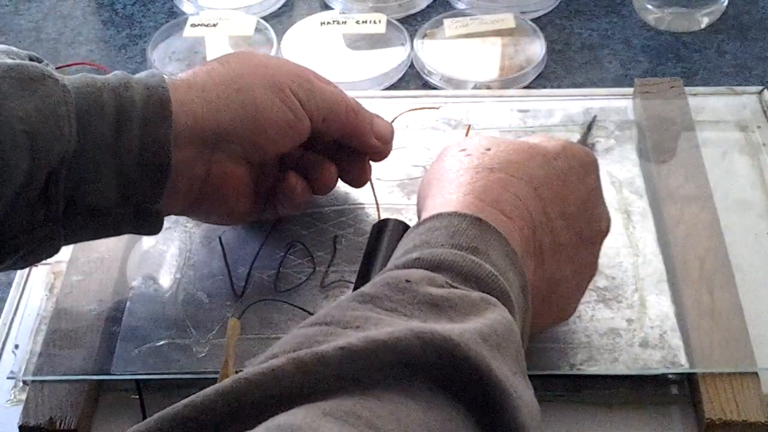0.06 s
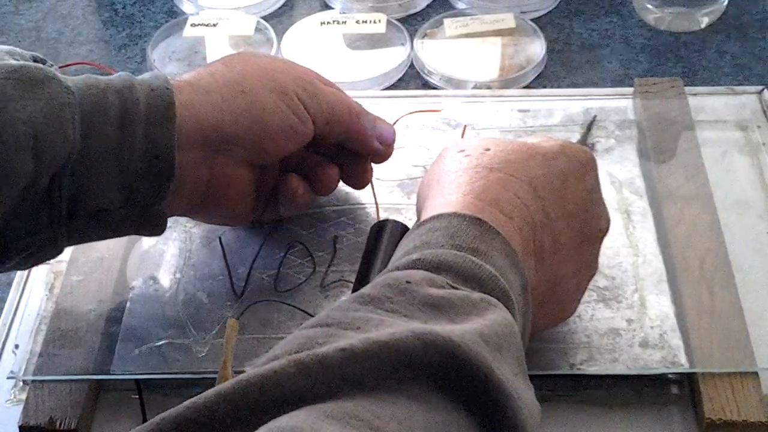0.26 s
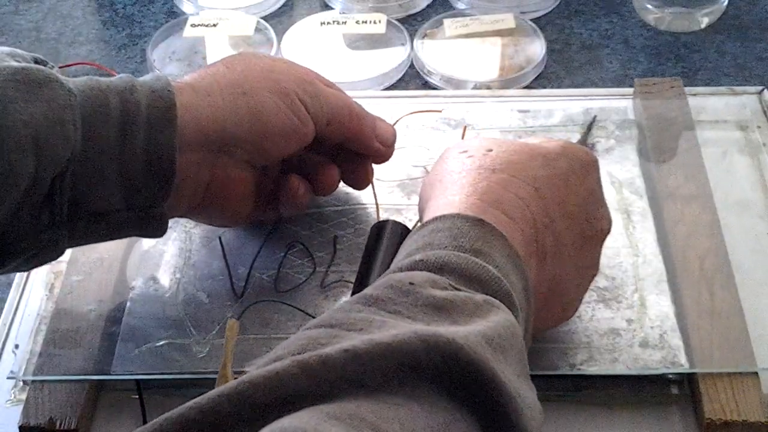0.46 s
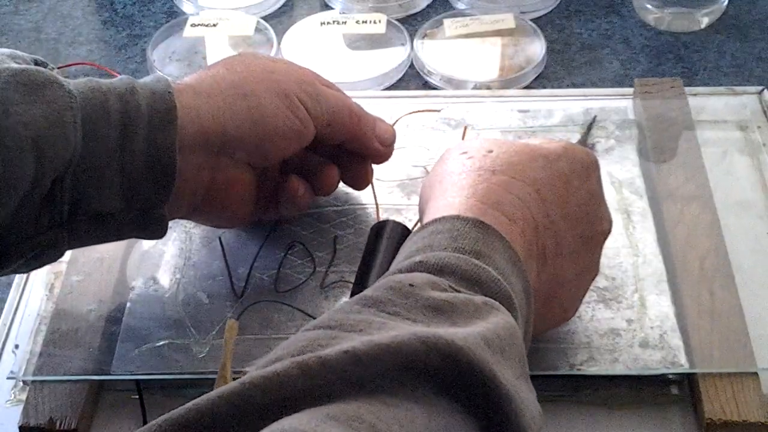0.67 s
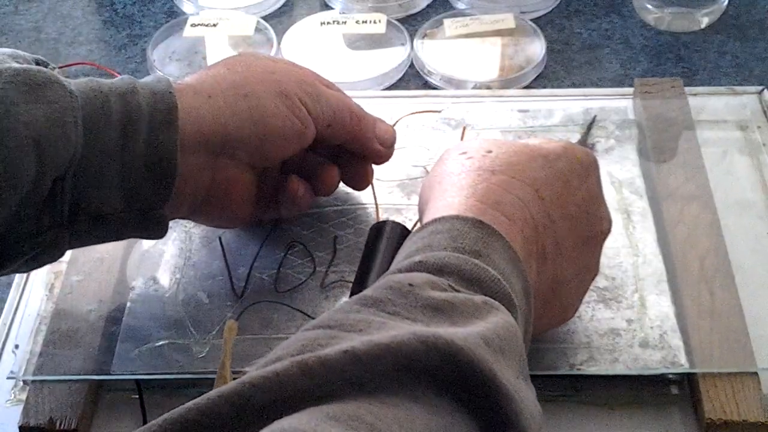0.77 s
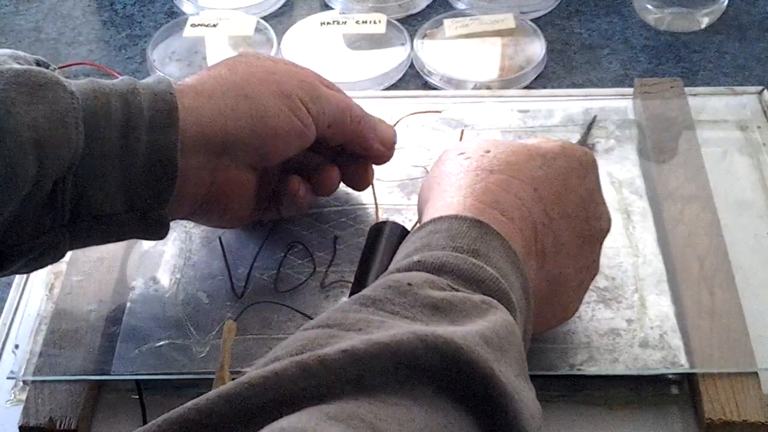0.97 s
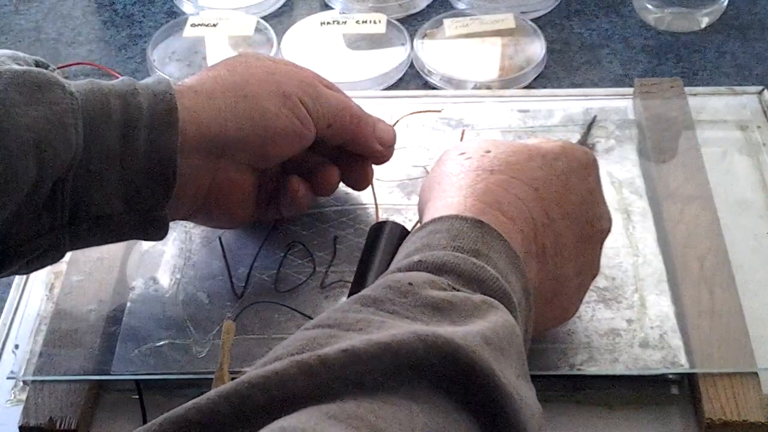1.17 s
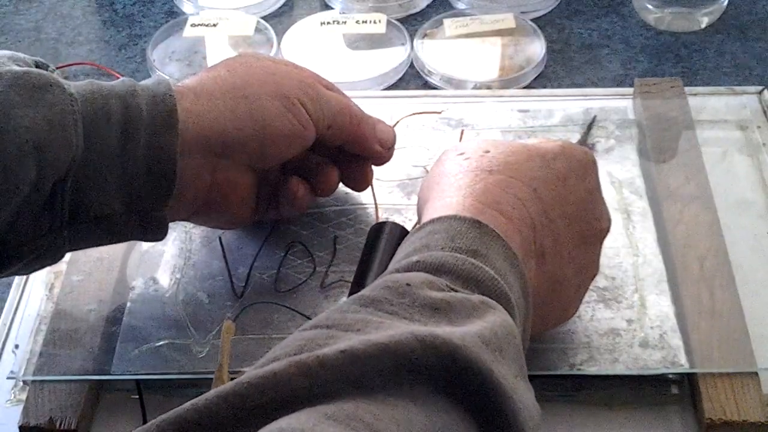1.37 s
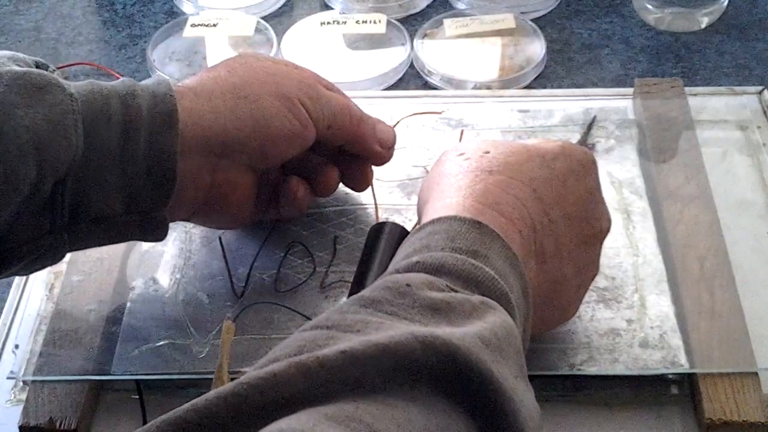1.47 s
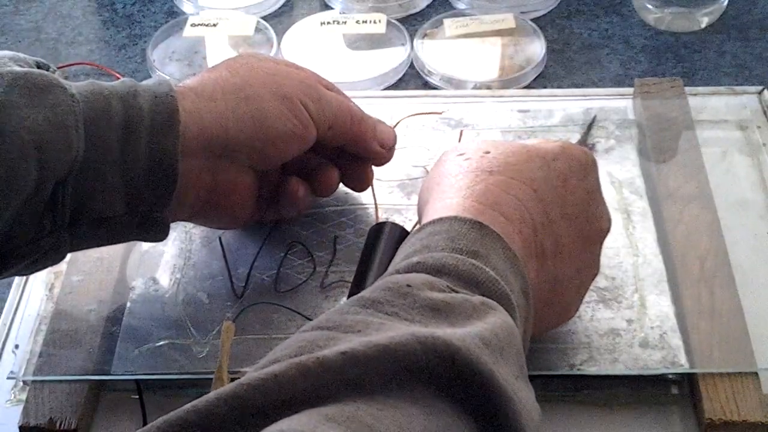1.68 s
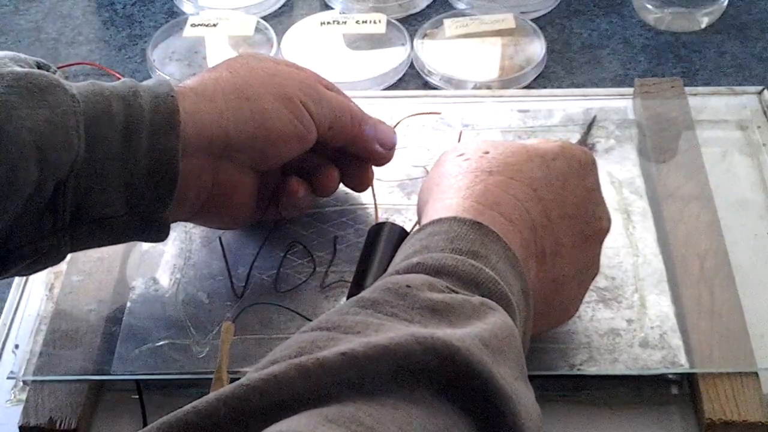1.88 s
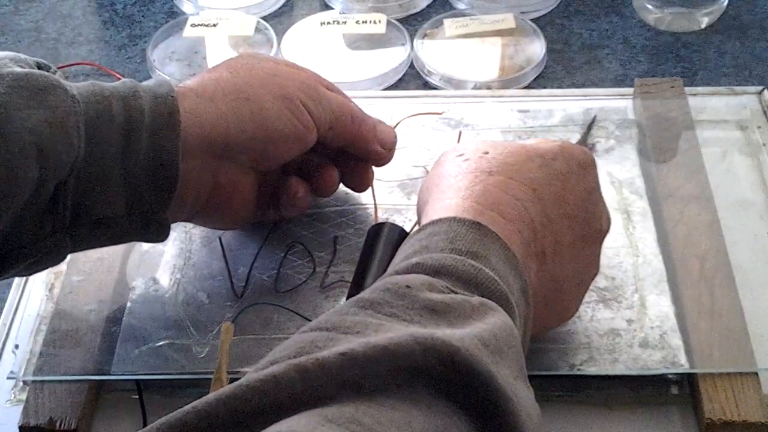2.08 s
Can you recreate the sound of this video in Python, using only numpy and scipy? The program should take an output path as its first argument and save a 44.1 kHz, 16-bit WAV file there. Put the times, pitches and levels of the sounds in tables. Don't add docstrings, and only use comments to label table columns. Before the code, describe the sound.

Sharp electric sparks snap loudly across a gap, sparse at first, then in quick succession.

```python
import sys
import numpy as np
from scipy import signal
from scipy.fft import rfft, irfft, next_fast_len
from scipy.io import wavfile
from scipy.ndimage import uniform_filter1d

SR = 44100
rng = np.random.default_rng(int(sys.argv[2]) if len(sys.argv) > 2 else 0)


def voltage_ratio(level):
    return 10 ** (np.asarray(level, float) / 20)


def inscribe(sig):
    pcm = np.round(np.clip(np.atleast_2d(sig).T, -1, 1) * 32767)
    wavfile.write(sys.argv[1], SR, pcm.astype(np.int16))


N = 93844


def unit(x):
    return x / np.sqrt(np.mean(x ** 2) + 1e-20)


def along(points, hz):
    point_hz, value = np.transpose(points)
    return np.interp(np.log(hz + 1), np.log(point_hz + 1), value)


def filtered(x, response):
    size = next_fast_len(len(x) + 8192)
    gain = response(np.fft.rfftfreq(size, 1 / SR))
    return irfft(rfft(x, size) * gain, size)[:len(x)]


def hiss(spectrum, size):
    return unit(filtered(rng.standard_normal(size), lambda hz: voltage_ratio(along(spectrum, hz))))


# freq_hz, density_db (per Hz)
HUSH_SPECTRUM = [(15, -49.5), (25, -24.5), (247, -11), (276, -5), (314, -12.5), (845, -16), (2000, -23),
                 (2600, -63), (4400, -120)]
# freq_hz, density_db (per Hz)
MIC_SPECTRUM = [(1180, -41), (2000, -1), (2210, -9.5), (2950, -3), (4080, -9), (5780, -11), (6280, -14.5),
                (7790, -9), (14500, -8)]
# pitch_hz, level_db, width_hz
HUMS = [
    (290.6, -69, 25),
    (898, -70, 10.85),
]


def room_tone():
    hush_db, mic_db = -57.5, -58
    tone = np.zeros(N)
    for pitch_hz, level_db, width_hz in HUMS:
        resonance = lambda hz: 1 / (1 + ((hz - pitch_hz) / width_hz) ** 2)
        tone += voltage_ratio(level_db) * unit(filtered(rng.standard_normal(N), resonance))
    return tone + voltage_ratio(hush_db) * hiss(HUSH_SPECTRUM, N) + voltage_ratio(mic_db) * hiss(MIC_SPECTRUM, N)


# freq_hz, density_db (per Hz)
BENCH_SPECTRUM = [(88, -48), (150, -15), (1910, -5.5), (2650, -6), (3270, -4), (5510, -10.5), (6060, 0.5),
                  (11900, -8.5), (15000, -6)]
# freq_hz, density_db (per Hz)
ROOM_SPECTRUM = [(40, -52), (200, -24.5), (450, -18), (750, -13.5), (2200, -7.5), (3300, -8), (4300, -2),
                 (6400, -7.5), (9000, -1.5), (15500, -1)]
# freq_hz, t60_s
ROOM_T60 = [(300, 0.84), (800, .62), (1500, 0.51), (3500, 0.55), (6000, 0.48), (9000, 0.34), (14000, 0.27)]


def scatter():
    bench_db, bench_t60_s, room_db = -3.5, 0.055, -7
    bend_db = -180
    t = np.arange(SR // 2) / SR
    hz, frame_s, z = signal.stft(hiss(ROOM_SPECTRUM, len(t)), SR, nperseg=128)
    decay_db = -60 * frame_s / along(ROOM_T60, hz)[:, None] + bend_db * frame_s ** 2
    tail = signal.istft(z * voltage_ratio(decay_db), SR, nperseg=128)[1][:len(t)]
    clutter = voltage_ratio(bench_db - 60 * t / bench_t60_s) * hiss(BENCH_SPECTRUM, len(t))
    return clutter + voltage_ratio(room_db) * tail


# pitch_hz, level_db, t60_s
PORT_RINGS = [(1480, 3.5, 0.0054), (4412, 1.5, 0.0068), (4856, 11, 0.0043), (5250, -2.5, 0.011),
              (7040, 2.5, 0.017), (12790, 0.5, 0.0051)]
# delay_s, level_db, centre_hz, length_s
NEAR_ECHOES = [(.0016, -4, 12800, .0006), (.0027, -4, 9300, .0005), (.0037, -2, 9800, .0006),
               (.0038, -1, 13000, .0006), (.0042, -6, 4300, .0006), (.0056, 3, 12100, .0007),
               (.0085, -2, 12300, .0008)]
# delay_s, level_db, centre_hz, length_s
WALL_ECHOES = [(.0186, -2, 11000, .0003), (.0295, -6, 9000, .0003), (.0425, -10, 5000, .0005),
               (.046, -5, 6000, .0003)]


def shock():
    t = np.arange(SR // 16) / SR
    x = np.zeros(len(t))
    for pitch_hz, level_db, t60_s in PORT_RINGS:
        x += voltage_ratio(level_db - 60 * t / t60_s) * np.sin(2 * np.pi * pitch_hz * t)
    for delay_s, level_db, centre_hz, length_s in NEAR_ECHOES + WALL_ECHOES:
        age = np.clip((t - delay_s) / length_s, 0, None)
        pulse = np.e * 3 * age * np.exp(-3 * age)
        level = voltage_ratio(level_db + 0.4 * rng.standard_normal())
        x += level * pulse * np.sin(2 * np.pi * centre_hz * (t - delay_s))
    return x


# freq_hz, density_db (per Hz)
THUD_SPECTRUM = [(20, -22.5), (150, -17.5), (250, 8), (600, 6.5), (900, -22.5), (2000, -100.5)]


def thud(size):
    t60_s = 0.034
    return voltage_ratio(-60 * np.arange(size) / SR / t60_s) * hiss(THUD_SPECTRUM, size)


# start_s, level_db, thud_db
SPARKS = [(.3365, -1.5, -20), (0.8649, -1, -31), (0.9736, -0.5, -23), (1.0736, 1, -12),
          (1.314, -0.5, -26.5), (1.6178, -1, -31), (1.7191, -0.5, -16.5), (1.8006, -1, -24.5),
          (1.8921, -2, -17.5), (1.9571, -4, -23), (2.0378, -2, -18.5), (2.113, 0, -23)]


def sparks():
    fresh = 0.15
    smear_s, smear_db = 0.003, -23
    lead = round(smear_s * SR)
    out = np.zeros(N + SR)
    shared = scatter()
    for start_s, level_db, thud_db in SPARKS:
        x = np.sqrt(1 - fresh) * shared + np.sqrt(fresh) * scatter()
        front = shock()
        x[:len(front)] += front
        x += voltage_ratio(thud_db) * thud(len(x))
        start = round(start_s * SR)
        out[start:][:len(x)] += voltage_ratio(level_db) * x
        smear = hiss(BENCH_SPECTRUM, 300)[:lead] * np.linspace(0.3, 1.2, lead)
        out[start - lead:start] += voltage_ratio(smear_db) * smear
    return out[:N]


# freq_hz, density_db (per Hz)
SLEEVE_SPECTRUM = [(800, -30), (1500, -11), (2700, 0), (3300, -8.5), (6000, -13), (12000, -22)]


def sleeve():
    start_s, level_db, rise_s, fade_s = 0.675, -56.5, 0.01, 0.097
    age = np.clip(np.arange(N) / SR - start_s, 0, None)
    envelope = (1 - np.exp(-age / rise_s)) * np.exp(-age / fade_s)
    return voltage_ratio(level_db) * envelope * hiss(SLEEVE_SPECTRUM, N)


def scene():
    return np.tile(sparks() + room_tone() + sleeve(), (2, 1))


def clip(x):
    knee = 8.1
    return x / (1 + np.abs(x) ** knee) ** (1 / knee)


def levelled(x):
    release_s, delay_s, threshold_db, strength = 0.017, 0.012, -36, 0.054
    slow = np.exp(-1 / (release_s * SR))
    power = signal.lfilter([1 - slow], [1, -slow], x ** 2)
    recent = np.pad(power, (round(delay_s * SR), 0))[:N]
    return x * (1 + recent / voltage_ratio(2 * threshold_db)) ** (-strength / 2)


def band_limited(x):
    top_hz, edge_hz = 14620, 45
    return filtered(x, lambda hz: 0.5 - 0.5 * np.tanh((hz - top_hz) / edge_hz / 2))


# freq_hz, threshold_db
MASKING = [(60, -27), (170, -27), (300, -28), (520, -27), (640, -25), (760, -23), (800, -90)]


def without_faint_bass(x):
    loud_db = -16
    hz, _, z = signal.stft(x, SR, nperseg=1024)
    power = np.abs(z) ** 2
    whole = power.sum(0)
    threshold = whole * voltage_ratio(2 * along(MASKING, hz))[:, None]
    keep = uniform_filter1d(power, size=3, axis=0) > threshold
    keep = keep | (whole > voltage_ratio(2 * loud_db))
    return signal.istft(z * keep, SR, nperseg=1024)[1][:N]


# start_s, length_s, level_db (under the sound), share (of bands)
SPLITS = [
    (.982, .045, -14, .7),
    (1.052, .012, -15, .9),
    (1.51, .03, -12, .35),
    (1.63, .04, -15, .55),
    (1.765, .025, -17, .6),
    (1.804, .045, -15, .55),
]


def difference(x):
    band_hz, low_hz = 700, 500
    hz, t, z = signal.stft(x, SR, nperseg=512)
    band = (hz // band_hz).astype(int)
    gain = np.zeros(z.shape)
    for start_s, length_s, level_db, share in SPLITS:
        draw = rng.random(band.max() + 1)[band]
        chosen = draw * (1 + (hz < low_hz)) < share
        during = (t > start_s) & (t < start_s + length_s)
        gain += voltage_ratio(level_db) * np.outer(chosen, during)
    scrambled = np.exp(2j * np.pi * rng.random(z.shape))
    return signal.istft(z * gain * scrambled, SR, nperseg=512)[1][:N]


def band_limit(x):
    return signal.sosfilt(signal.butter(12, 15570, fs=SR, output="sos"), x)


def record(dry):
    x = without_faint_bass(band_limited(levelled(clip(dry[0]))))
    side = difference(x)
    mix = np.clip(0.96 * np.array([x + side, x - side]), -1, 1)
    return band_limit(mix)


dry = scene()
out = record(dry)
inscribe(out)
```